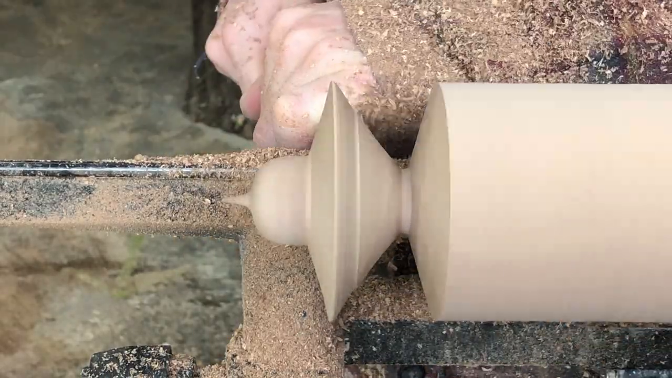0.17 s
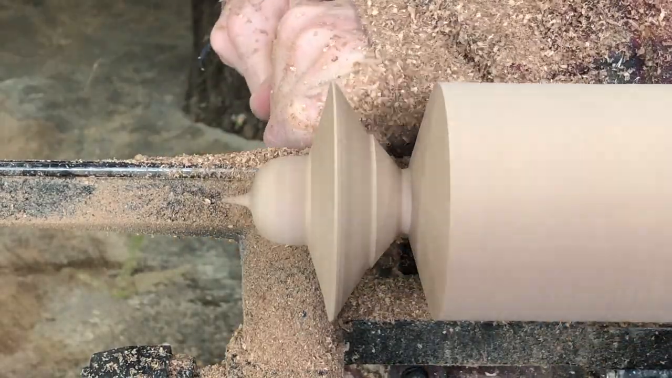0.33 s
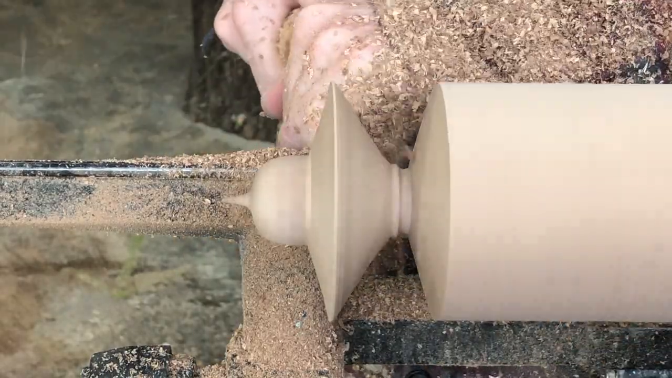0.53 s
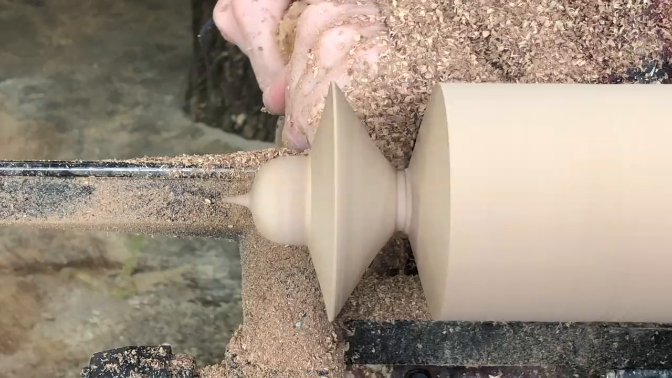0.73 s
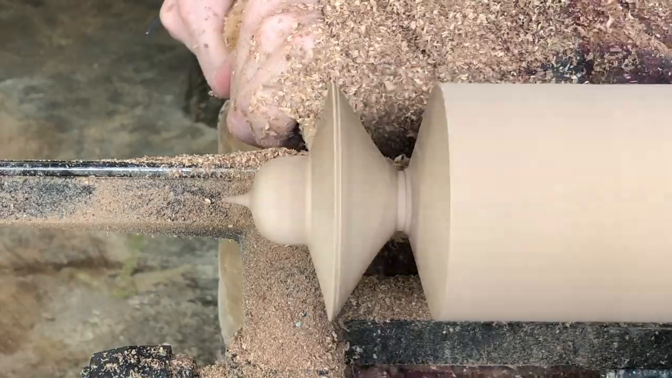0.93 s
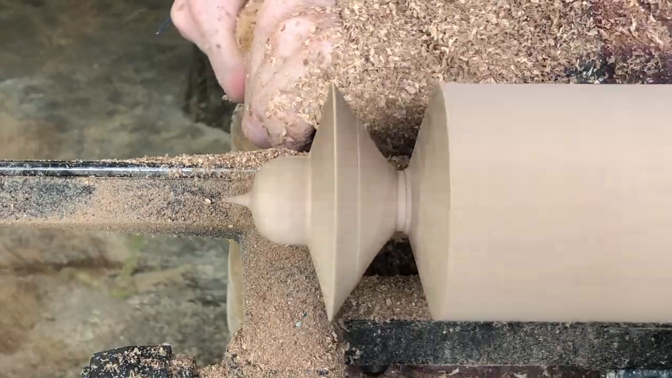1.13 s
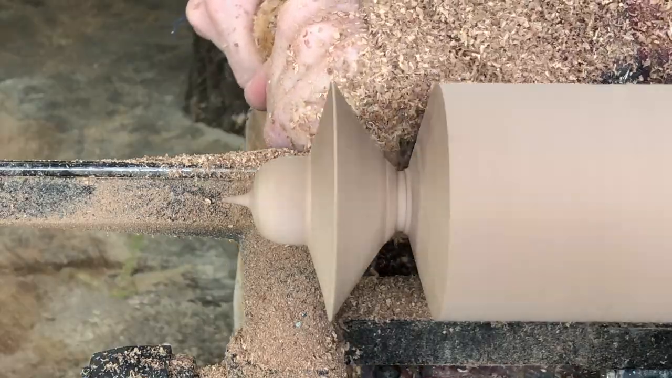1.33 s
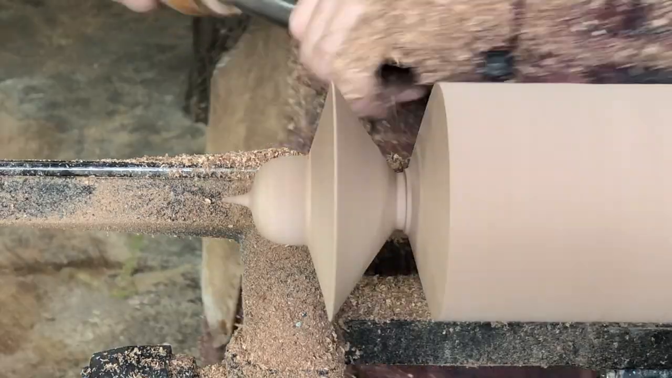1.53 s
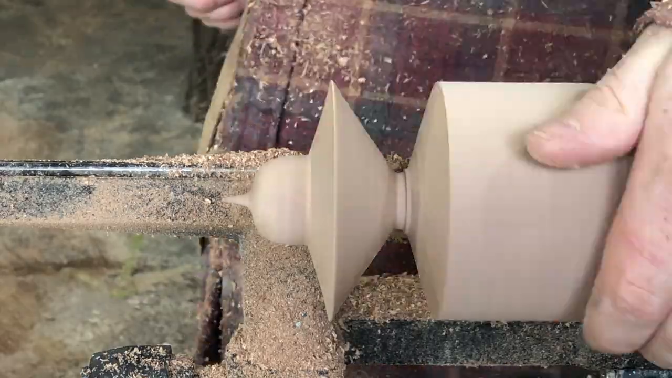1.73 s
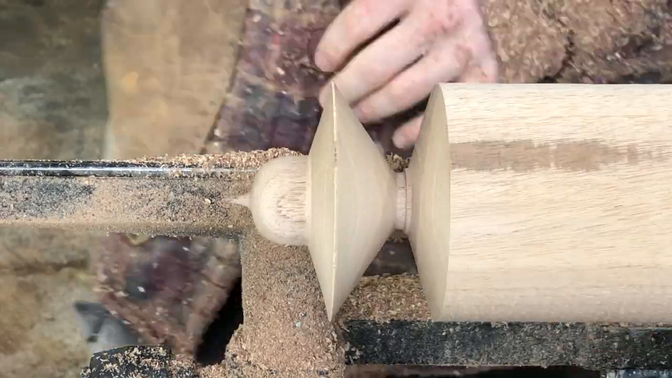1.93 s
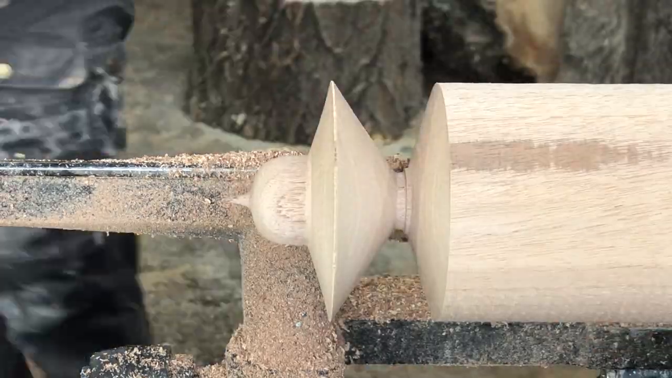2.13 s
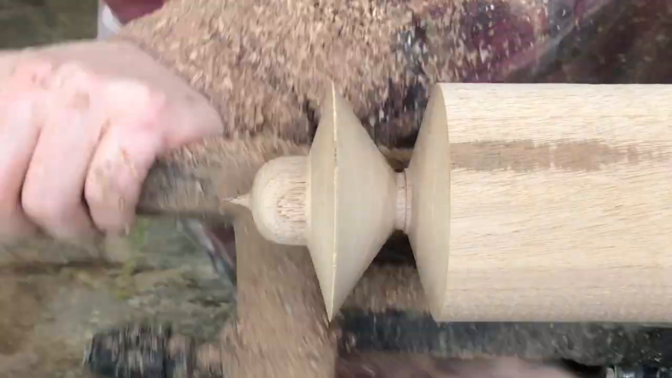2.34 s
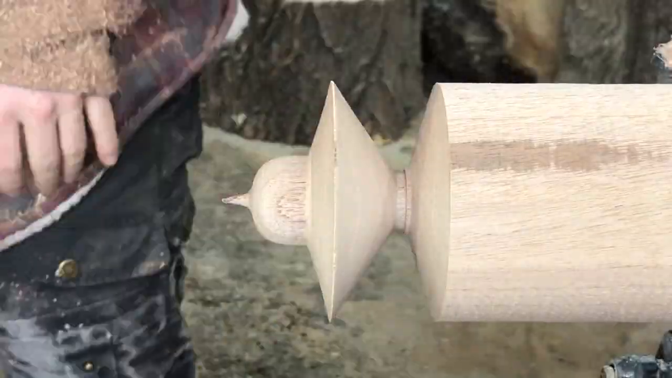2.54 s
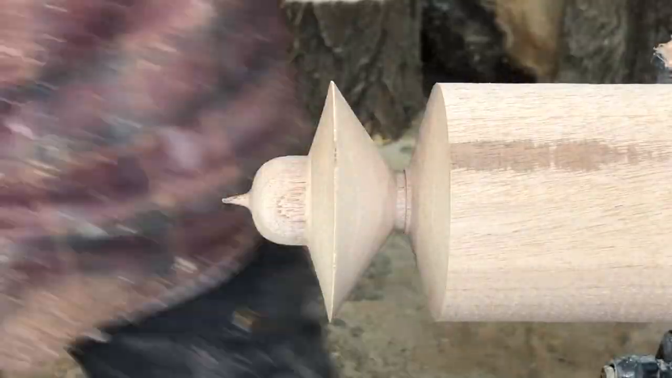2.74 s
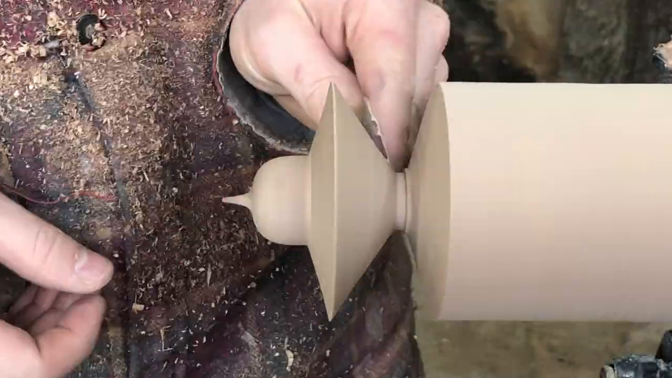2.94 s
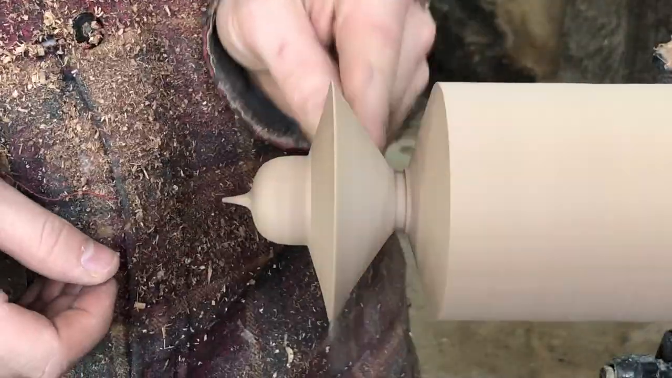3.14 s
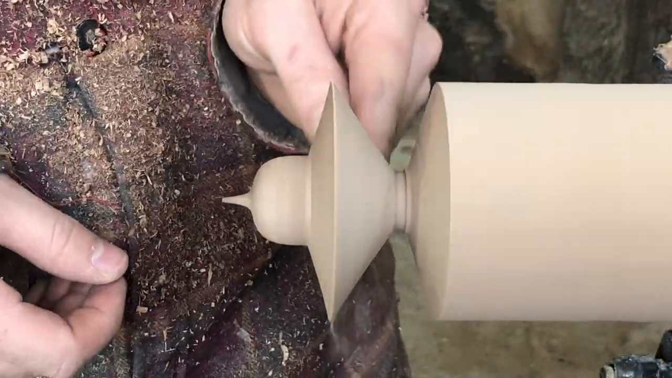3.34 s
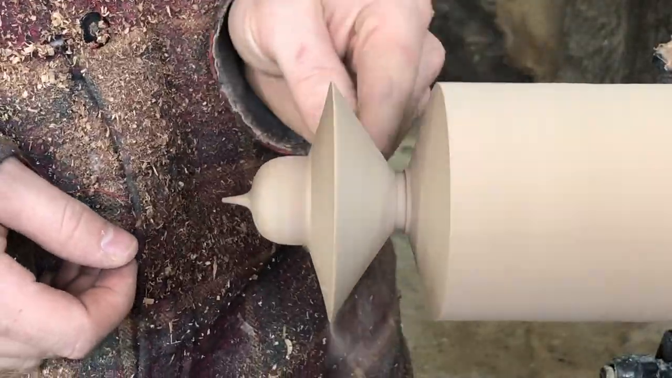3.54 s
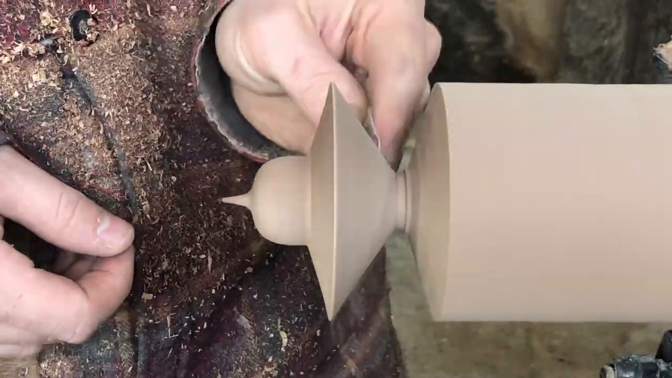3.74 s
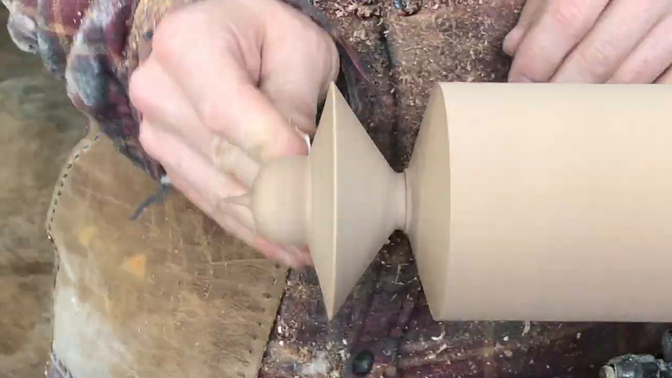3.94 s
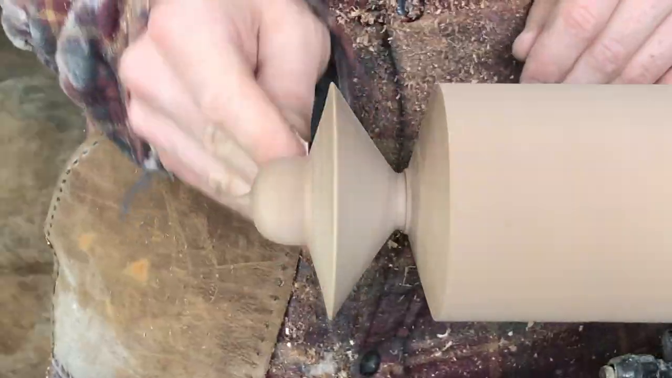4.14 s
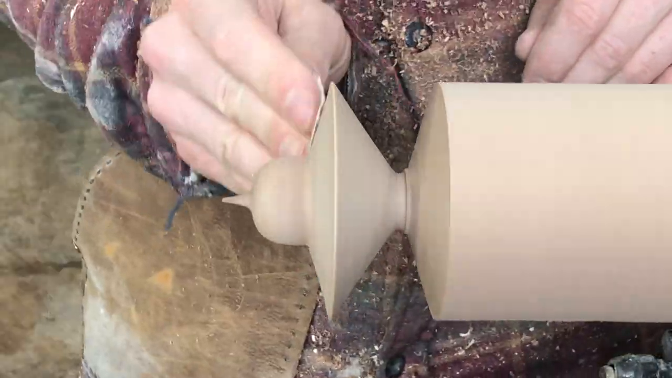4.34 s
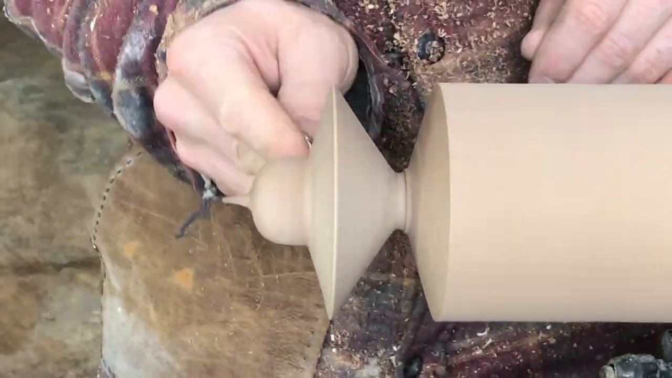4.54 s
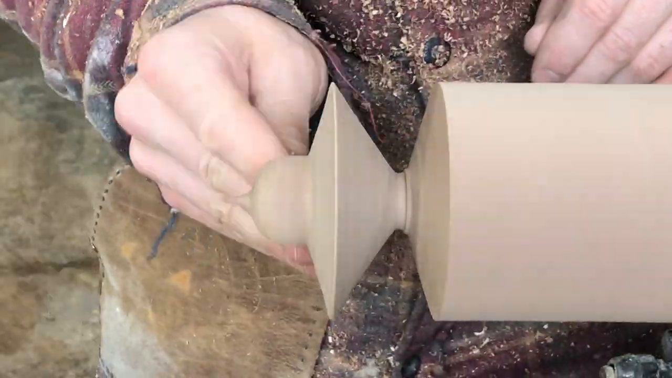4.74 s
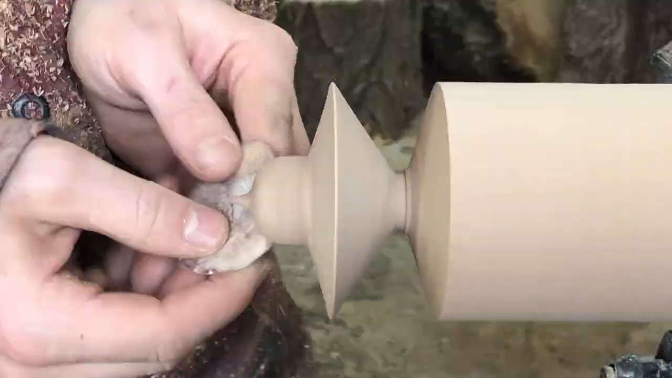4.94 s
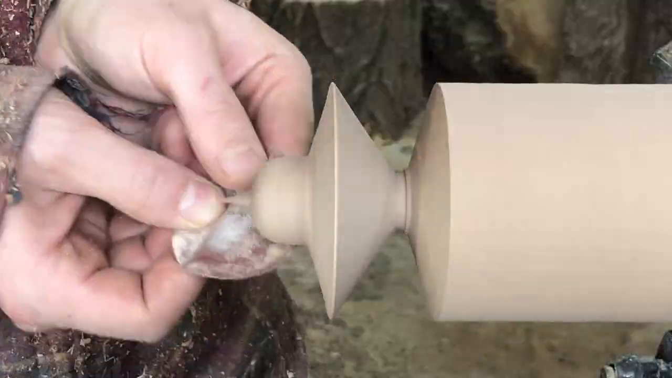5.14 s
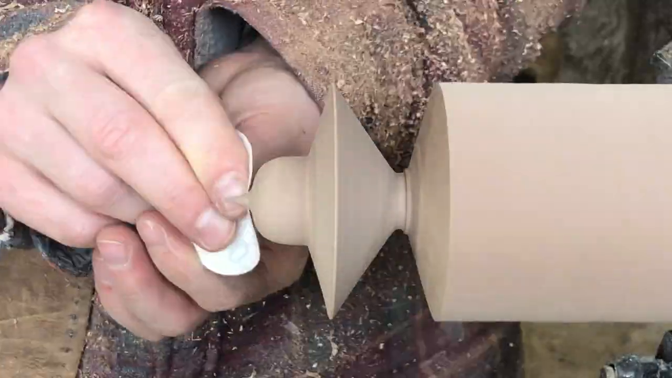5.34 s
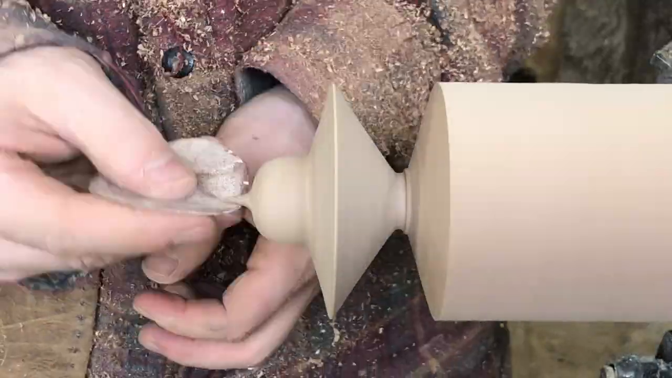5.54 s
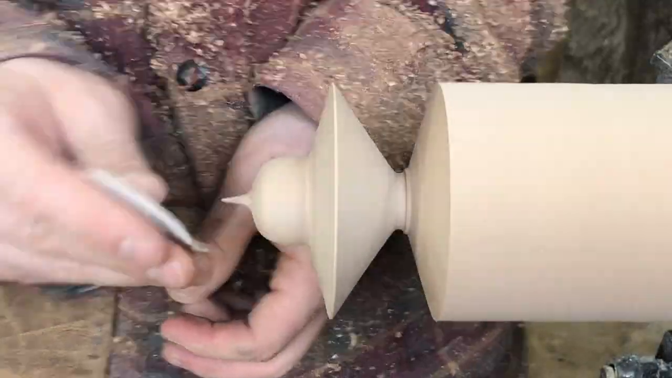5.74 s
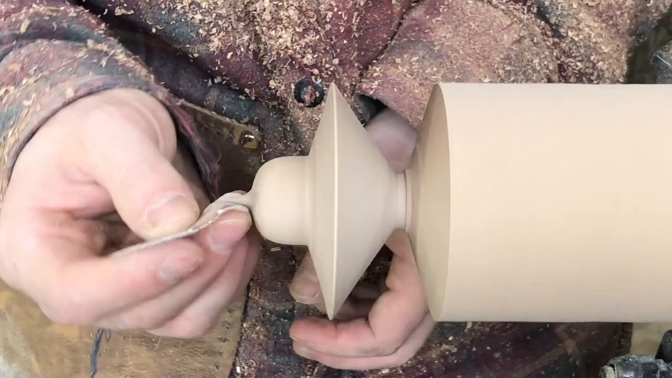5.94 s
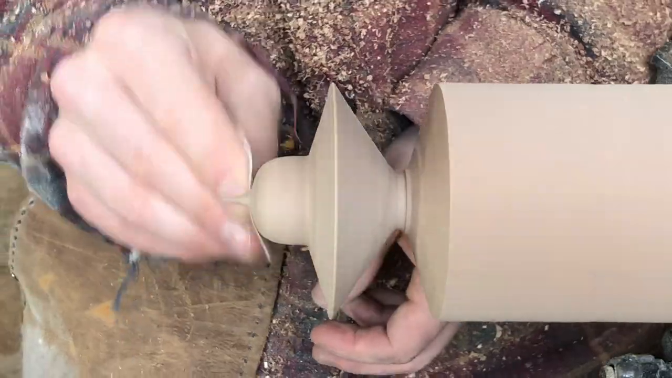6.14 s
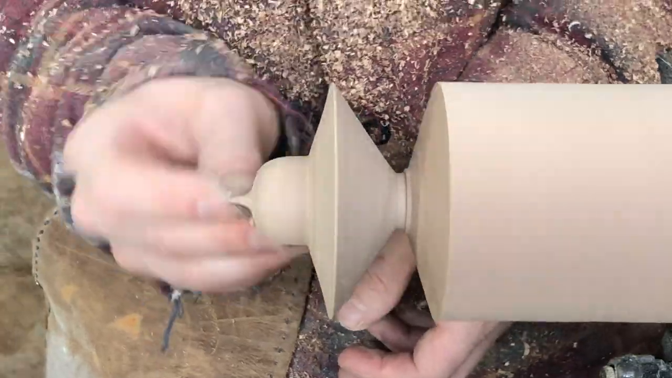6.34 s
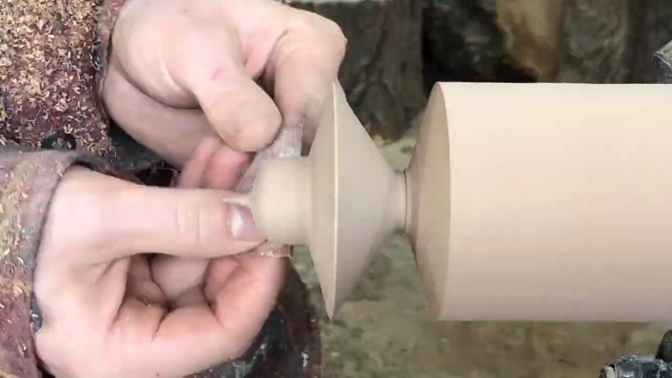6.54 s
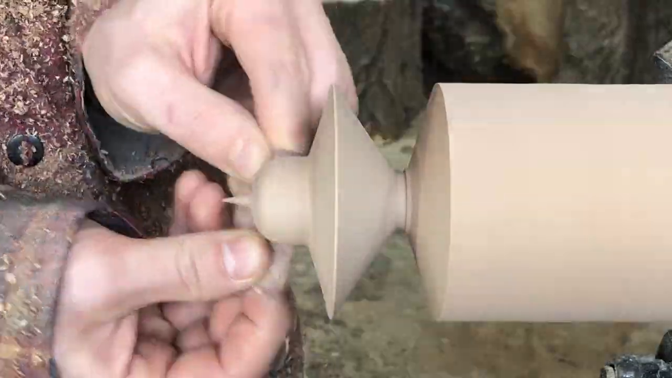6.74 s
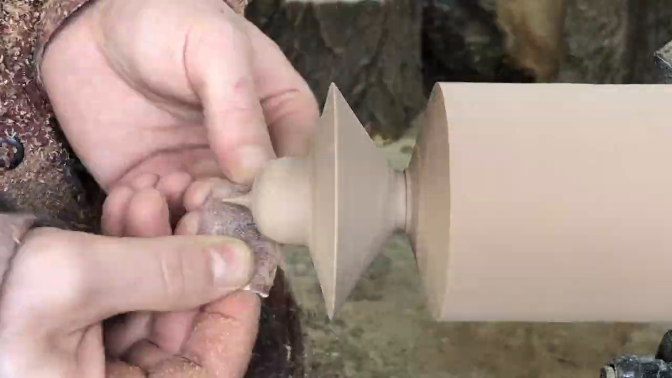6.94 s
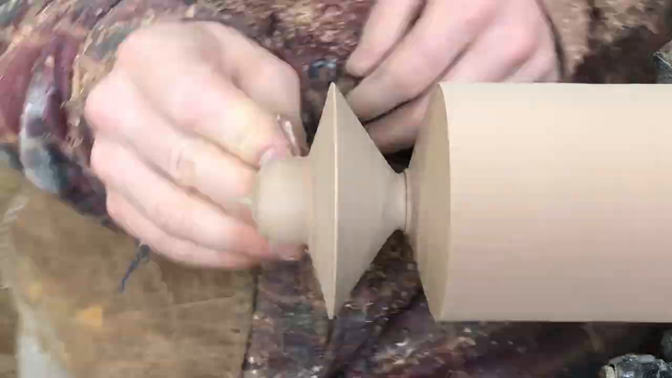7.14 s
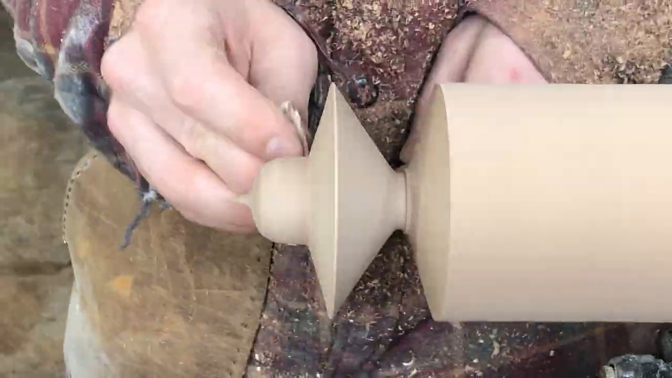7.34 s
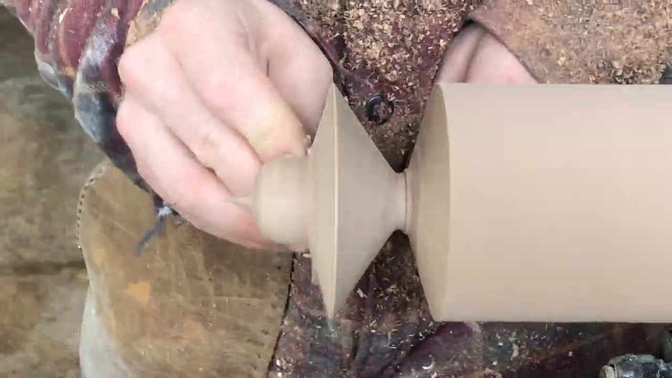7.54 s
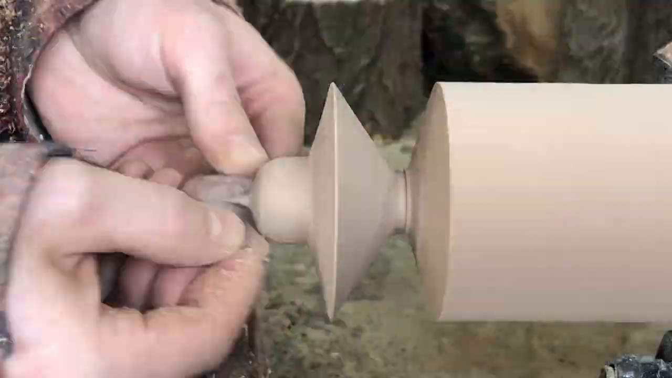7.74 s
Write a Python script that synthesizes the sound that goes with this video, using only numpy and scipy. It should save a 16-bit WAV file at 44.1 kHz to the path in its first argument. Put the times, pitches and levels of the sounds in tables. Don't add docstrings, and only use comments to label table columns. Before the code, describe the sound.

A close, dry workshop sound. From 0 s a lathe motor whirs with a thin, ringing whine and air hiss, while a chisel peels grainy, high hissing shavings from the spinning wood. The cut is strongest around 0.3-0.6 s, with low judder and short squeals near 0.65-0.75 s; a second, lighter cut swells until the chisel lifts with a small squeal and ticks at 1.5 s. At about 1.7 s the motor tones slide down and stop. In the quiet, hands rustle and tick over a faint room murmur and thin fan tone. A sharp metallic knock lands at 2.16 s, a far louder iron clank at 2.64 s. A click and the lathe's abrupt return come at 2.85 s. At 3.44 s everything jumps up in pitch: a brighter, denser whine and hiss holds to about 7.9 s, wavering slightly as sandpaper presses and eases, with a faint low hum.

```python
import sys
import numpy as np
from scipy import signal
from scipy.fft import rfft, irfft
from scipy.io import wavfile
from scipy.ndimage import uniform_filter1d

SR = 44100
rng = np.random.default_rng(int(sys.argv[2]) if len(sys.argv) > 2 else 0)


def convert_level_to_amplitude(level_db):
    exponent = np.asarray(level_db, float) / 20
    return 10 ** exponent


def dump_mix(stems):
    frames = np.atleast_2d(stems).T
    limited = np.clip(frames, -1, 1)
    pcm = np.round(limited * 32767).astype(np.int16)
    wavfile.write(sys.argv[1], SR, pcm)


N = 347508
T = np.arange(N) / SR

OFF_S, ON_S = 1.737, 2.842
LIFT_S = 1.5
LIGHT_DB = -47


def unit(x):
    return x / np.sqrt(np.mean(x ** 2))


def curve(rows, column):
    rows = np.array(rows)
    return np.interp(T, rows[:, 0], rows[:, column])


def fade(rows, column, fade_s=.008):
    edge = np.clip(np.minimum(T - rows[0][0], rows[-1][0] - T) / fade_s + 1, 0, 1)
    on = edge > 0
    edge[on] *= convert_level_to_amplitude(curve(rows, column)[on])
    return edge


def note(s, length, hz, db, attack, release, glide=0., depth_db=22):
    times = s + np.array([-attack, 0, length, length + release])
    levels = db - depth_db * np.array([1, 0, 0, 1])
    return np.transpose([times, hz * np.exp(glide * (times - s)), levels])


def swell(s, length, db, attack, release, depth_db):
    return fade(note(s, length, 1, db, attack, release, depth_db=depth_db), 2)


def coloured(points, size=N):
    hz, db = np.transpose(points)
    f = np.fft.rfftfreq(size, 1 / SR) + 1
    gain = convert_level_to_amplitude(np.interp(np.log(f), np.log(hz), db))
    return unit(irfft(rfft(rng.standard_normal(size)) * gain, size))


def walk(rate):
    k = int(SR / rate / 8)
    steps = np.repeat(rng.standard_normal(N // 8 // k + 2), k)
    slow = uniform_filter1d(uniform_filter1d(steps, k), k)
    return np.repeat(unit(slow), 8)[:N]


def tone(rows, wobble_hz=1.8, overtone_db=-60, rough_db=1.5):
    gain = np.sqrt(2) * fade(rows, 2)
    on = gain > 0
    gain[on] *= convert_level_to_amplitude(rough_db * walk(200)[on])
    phase = 2 * np.pi * np.cumsum((curve(rows, 1) + wobble_hz * walk(150))[on]) / SR
    gain[on] *= np.sin(phase) + convert_level_to_amplitude(overtone_db) * np.sin(2 * phase)
    return gain


def drive(speed, tones_db, low_db, load_db, on, shaft, since_cut=0 * T):
    # (pitch [Hz], level [dB])
    tone_table = [(2401, -60), (2756, -70), (3117, -67), (3569, -66), (4091, -66), (4764, -71), (4990, -72),
                  (5200, -66), (5356, -70), (5394, -70), (5954, -66), (6444, -58), (6541, -62), (6708, -59),
                  (6982, -69), (7144, -54), (7305, -57), (7354, -58), (7574, -61), (7978, -70), (8398, -56),
                  (9125, -67), (9539, -66), (9808, -70), (10406, -64), (10734, -62), (11047, -64),
                  (11310, -65), (12801, -73), (14287, -71), (8333, -59), (7197, -66), (6500, -67),
                  (6728, -64), (6229, -69), (8190, -68)]
    # (pitch [Hz], width [Hz], level [dB])
    housing_table = [(2290, 200, -14), (4110, 220, -11), (5380, 170, -15), (6030, 70, -7), (6270, 90, -8),
                     (6430, 60, -7), (6530, 90, -7), (7210, 50, -8), (7350, 150, -2), (7480, 60, -9),
                     (7565, 80, -4), (8200, 70, -9), (8355, 150, -1), (9220, 260, -12), (9790, 70, -15),
                     (10790, 170, -7), (11030, 60, -11), (11285, 80, -9), (12800, 100, -18),
                     (13400, 140, -17), (14290, 60, -18), (15550, 200, -18)]
    shaft_hz, throb, jitter = 52, 0.15, 0.52
    sink_per_s, die_db_per_s = 3.6, 250
    turning = shaft * np.exp(-sink_per_s * since_cut) + 0.0004 * walk(3)
    clock = (2 * np.pi * speed * np.cumsum(turning) / SR)[on]
    turns = shaft_hz * clock + jitter * walk(10)[on]
    tones = np.zeros(N)
    for k, (hz, db) in enumerate(tone_table):
        turn = 1 + throb * np.sin(turns + 7 * rng.random())
        damped = 7000 < hz < 7200 or 7400 < hz < 8500
        change_db = load_db * (k < 2) - 4 * (T < LIFT_S) * damped + 1.5 * walk(15)
        gain = turn * convert_level_to_amplitude(db + change_db[on])
        tones[on] += gain * np.sin(hz * clock + 7 * rng.random() + jitter * walk(30)[on])
    f = np.fft.rfftfreq(N, 1 / SR) / speed
    power = np.zeros(len(f))
    for hz, width, db in housing_table:
        db = db + low_db * ((hz < 3000) + .17 * (7450 < hz < 8500))
        steepness = np.where(f < hz, 3, 10)
        power += convert_level_to_amplitude(2 * db) / (1 + np.abs(2 * (f - hz) / width) ** steepness)
    housing = irfft(rfft(rng.standard_normal(N)) * np.sqrt(power), N)
    return unit(housing) + convert_level_to_amplitude(tones_db - die_db_per_s * since_cut) * tones / np.std(tones[on])


def running(early):
    coast_db_per_s2 = 5300
    coast = convert_level_to_amplitude(-np.minimum(coast_db_per_s2 * np.maximum(T - OFF_S + early, 0) ** 2, 90))
    return np.maximum(coast, np.clip((T - ON_S) / 0.0043, 0, 1))


def lathe():
    # (frequency [Hz], density [dB per Hz])
    air_slow = [(15, -58), (25, -19), (342, -21.5), (878, -23), (1090, -21.5), (1210, -26.5), (1870, -19),
                (2020, -21.5), (2440, -15), (2720, -17.5), (4420, -14), (6630, -14), (7180, -19.5),
                (15700, -14)]
    # (frequency [Hz], density [dB per Hz])
    air_fast = [(15, -47), (25, -15), (1770, -9), (2320, -8.5), (2720, -10), (4080, -7.5), (4540, -11),
                (6810, -7), (7380, -10), (8910, -6.5), (10200, -8.5), (11100, -5.5), (12000, -9),
                (15700, -12)]
    # (time [s], length [s], level [dB], swell [s], fade [s])
    kick_table = [
        (1.837, 0.038, -59, .003, .025),
        (2.822, 0.0092, -53, 0.032, 0.014),
    ]
    # (time [s], pitch [Hz])
    shaft_table = [
        (3.5, 7138),
        (3.95, 7141),
        (4.4, 7133),
        (4.9, 7144),
        (5.9, 7145),
        (6.4, 7144),
        (6.85, 7136),
        (7.4, 7136),
        (7.85, 7144),
    ]
    faster_s, slow_speed, free_hz = 3.438, .5992, 7144
    cut_s, eased_s = 1.66, 5.03
    loaded_db, eased_db = -9, -2
    chisel_sag, sag_db, air_per_db = .0003, 600, 0.3

    since_cut = np.clip(T - cut_s, 0, .4) * (T < ON_S)
    slow_shaft = 1 - chisel_sag * (T < LIFT_S)
    slow_drive = drive(slow_speed, -1.6, -12.0, loaded_db, T < faster_s + .01, slow_shaft, since_cut)
    kicks = sum(swell(s, length, db, rise, end, 15) for s, length, db, rise, end in kick_table)
    slow = convert_level_to_amplitude(-2.03) * (convert_level_to_amplitude(-41) * running(0) + kicks) * slow_drive
    dust_db = air_per_db * uniform_filter1d(np.maximum(pressure() - LIGHT_DB, 0), size=6000)
    air_gain = convert_level_to_amplitude(-65 + dust_db) * running(0.019) + convert_level_to_amplitude(-24.5) * kicks
    slow = (
        slow + convert_level_to_amplitude(20.0) * air_gain * coloured(air_slow) * convert_level_to_amplitude(0.93 * walk(29.33)))

    shaft = uniform_filter1d(curve(shaft_table, 1), size=4000) / free_hz
    load_db = np.where(T < eased_s, loaded_db, eased_db)
    fast_drive = drive(1, 0.21 + sag_db * (shaft - 1), 0, load_db, T > faster_s - .01, shaft)
    fast = convert_level_to_amplitude(-41.5 + 0.31 * walk(2.45) - 2.1) * fast_drive
    fast = fast + convert_level_to_amplitude(-56.5 + .5 * walk(2.95) + 13.0 + 0.46 * walk(30)) * coloured(air_fast)
    share = np.clip((T - faster_s) / .004 + .5, 0, 1)
    return np.sqrt(1 - share) * slow + np.sqrt(share) * fast


def pressure():
    # (time [s], level [dB])
    cuts = [
        [(0, -54), (.12, -44), (.332, -36.5), (.388, -35.5), (.48, -30.5), (.51, -39), (.59, -32), (.62, -42.5),
         (.79, -49)],
        [(.8, -50), (1.234, -39.5), (1.26, -46), (1.424, -38), (1.48, -43), (1.498, -53), (1.55, -60)],
    ]
    return curve(cuts[0] + cuts[1], 1)


def chisel():
    # (frequency [Hz], density [dB per Hz])
    shaving_points = [(5000, -30), (10500, -11), (11200, 3.5), (12300, 2), (13200, 6), (13800, 4),
                      (14500, 9), (15000, 7), (15700, 0)]
    # (frequency [Hz], density [dB per Hz])
    scrape_points = [(500, -43), (2000, -12), (6000, -5), (10500, -7), (14000, -9)]
    # (frequency [Hz], density [dB per Hz])
    judder_points = [(25, -4), (300, -1), (1000, -1.5), (2000, -2.5), (3500, -11)]
    # (time [s], length [s], pitch [Hz], level [dB], scrape level [dB])
    squeal_table = [
        (0.659, 0.0037, 2945, -34.5, -42),
        (0.711, 0.011, 2940, -37.5, -47),
        (.728, 0.0064, 2950, -33.5, -49),
        (0.744, 0.011, 2960, -39, -52),
        (1.473, 0.0037, 2930, -35.5, -41),
    ]
    # (time [s], length [s], level [dB])
    dig_table = [
        (.345, .02, -58),
        (.38, 0.031, -47),
        (.428, .004, -54),
        (0.448, .006, -53),
        (.478, 0.015, -54),
    ]
    # (time [s], length [s], pitch [Hz], level [dB])
    shank_table = [(0.65, 0.13, 13180, -52), (1.2, .04, 13170, -58), (1.31, 0.11, 13200, -48),
                   (.53, .09, 2842, -51), (1.04, 0.086, 2840, -49), (1.185, .01, 2850, -46.5),
                   (1.04, .2, 2577, -58), (1.28, .1, 2845, -58), (0.25, 1.2, 3110, -57.5),
                   (0.092, 1.55, 3626, -58.5), (.3, 1.15, 5355, -61), (.3, 1.15, 4635, -63),
                   (.3, 1.15, 3370, -65), (.3, 1.15, 3845, -60), (0.055, 0.43, 2880, -58)]
    # (time [s], length [s], pitch [Hz], level [dB])
    rest_table = [
        (1.5, .1, 1185, -65),
        (0.735, 0.06, 1812, -57),
        (1.775, 0.01, 1822, -65.5),
        (.9, 0.67, 1822, -74),
        (3.5, 4.4, 1886, -75),
        (0, .3, 1126, -69.5),
        (.45, 0.4, 1130, -71),
        (1, 0.68, 1140, -68.5),
        (3, 0.39, 1122, -68.5),
    ]
    # (time [s], pitch [Hz], level [dB])
    hum_table = [(3.5, 335, -72), (3.9, 310, -72), (4.3, 350, -69), (4.6, 300, -72), (5.15, 300, -69.5),
                 (5.5, 280, -70.5), (6.0, 280, -77), (6.8, 320, -72), (7.2, 295, -73), (7.6, 348, -70),
                 (7.88, 320, -75)]
    scrape_db, judder_db, judder_per_db = -55, -66, 0.77

    push = pressure()
    touch = np.clip((LIFT_S - T) / .05 + 1, 0, 1)
    shavings = convert_level_to_amplitude(1.7 * walk(150) - 4.0 + push) * touch * coloured(shaving_points)
    grab = sum(swell(s, length, db, 0.035, 0.024, 15) for s, length, _, _, db in squeal_table)
    scrape_gain = convert_level_to_amplitude(scrape_db + 1.3 * walk(11.4)) * touch + grab
    scrape = convert_level_to_amplitude(2.0 * walk(100) - 1.0) * scrape_gain * coloured(scrape_points)
    dig = sum(swell(s, length, db, .015, .008, 10) for s, length, db in dig_table)
    shake = convert_level_to_amplitude(judder_db + judder_per_db * np.maximum(push - LIGHT_DB, 0)) * touch + dig + convert_level_to_amplitude(-24) * grab
    judder = convert_level_to_amplitude(1.9 * walk(400) - .8) * shake * coloured(judder_points)
    chatter = sum(tone(note(s, length, hz, db, .009, 0.027, glide=0.12),
                       wobble_hz=18.0, overtone_db=-8.5, rough_db=2.5) for s, length, hz, db, _ in squeal_table)
    shank = sum(tone(note(*row, .08, 0.067, depth_db=17), wobble_hz=(row[2] / 1700) ** 2, rough_db=2.5)
                for row in shank_table)
    rest = sum(tone(note(*row, 0.1, 0.1, depth_db=17), wobble_hz=3.9) for row in rest_table)
    hum = convert_level_to_amplitude(2.4 * walk(8)) * tone(hum_table, wobble_hz=12.0)
    return shavings + scrape + judder + chatter + shank + rest + hum


def burst(treble_db, bass_db, t60, rise, crackle_db=2.7):
    t = T[:8192]
    noise = coloured([(30, bass_db - 9.0), (400, bass_db - 8.0), (1000, bass_db + 3.0), (2500, 0.87), (6000, -3.5),
                      (11000, treble_db + 0.5), (16000, treble_db - 2.0)], size=8192)
    crackle = convert_level_to_amplitude(crackle_db * uniform_filter1d(np.repeat(rng.standard_normal(128), 64), size=48))
    onset = np.minimum(t / max(rise, 1e-4), 1) ** .5
    return noise * crackle * onset * convert_level_to_amplitude(-60 * np.maximum(t - rise, 0) / max(t60, .003))


def add(out, s, x):
    i = int(s * SR)
    out[i:i + len(x)] += x


def rustles():
    # (time [s], peak [dB], treble [dB], t60 [s])
    tick_table = [(1.729, -35, -6, .02), (.718, -27, -5, .01), (.658, -39, -4, .01), (1.8345, -47, -1, .02),
                  (1.843, -52, 2, .012), (1.853, -54, 4, .015), (1.859, -55, 3, .012),
                  (1.8705, -44, 5, .018), (1.882, -54, 4, .012), (1.901, -55, 3, .015),
                  (1.9345, -52, -2, .03), (2.017, -52, -10, .03), (2.033, -42, -8, .03),
                  (2.051, -58, -8, .015), (2.0857, -57, -6, .05), (2.109, -57, -3, .02),
                  (2.142, -35, -1.5, 0.032), (2.335, -41, 4, .006), (2.336, -51, -3, .05),
                  (2.4504, -47, -2, .04), (2.506, -41, -3, 0.042), (2.5445, -53, -14, .012),
                  (2.550, -54, -3, .012), (2.714, -58, 6, .02), (2.720, -60, 4, .015),
                  (2.765, -63, -22, .015), (2.852, -26, -1, .012), (2.603, -43, -17, .03),
                  (2.793, -52, -6, .03), (2.572, -60, -18, .012), (2.206, -62, 0, .015),
                  (2.217, -62, 0, .012)]
    # (time [s], peak [dB], treble [dB], rise [s])
    brush_table = [(1.839, -58, -7, 0.026), (1.955, -62, -4, .02), (1.974, -50, -7, .005),
                   (1.983, -52, -7, .006), (2.011, -55, -6, 0.006), (2.095, -63, -8, .012),
                   (2.114, -55, 0, 0.01), (2.150, -48, -4, 0.0067), (2.245, -53, -6, .004),
                   (2.253, -46, -7, 0.0086), (2.28, -64, -3, .01), (2.296, -46.5, -8, 0.009),
                   (2.35, -63, -9, .04), (2.39, -63, -9, .03), (2.458, -60, -2, .025),
                   (2.565, -65, -10, .01), (2.582, -56, -8, .003), (2.598, -50, -17, .004),
                   (2.61, -51.5, -4, 0.023), (2.792, -46, -4.5, 0.022)]
    dull_bass = 0.93
    out = np.zeros(N)
    for s, db, treble_db, t60 in tick_table:
        bass_db = -20.5 - dull_bass * treble_db
        add(out, s, convert_level_to_amplitude(db - 6.5) * burst(treble_db, bass_db, t60, .0006, crackle_db=1.0))
    for s, db, treble_db, rise in brush_table:
        t60 = 0.02 + 1.8 * rise
        add(out, s, convert_level_to_amplitude(db - 7.0) * burst(treble_db, -18 - dull_bass * treble_db, t60, rise))
    return out


def knocks():
    # (time [s], peak [dB], treble [dB], crack t60 [s], bass edge [Hz])
    knock_table = [
        (2.1593, -15, -12, 0.033, 1900),
        (2.643, -4, -18, 0.024, 650),
    ]
    # (pitch [Hz], level [dB], t60 [s])
    latch_modes = [(2590, -14, .035), (3140, -1, .034), (3397, -15, 0.043), (4581, -3, .016),
                   (5792, -6, .024), (6164, 0.5, 0.027), (7200, -14, .03), (8280, -8, .016),
                   (8834, -14, .026), (9921, -16, .028), (12210, -17, .024)]
    # (pitch [Hz], level [dB], t60 [s])
    bed_modes = [(1150, -5.5, .016), (1400, 0.5, 0.03), (1715, -0.5, 0.022), (2245, -7, 0.025),
                 (2566, 2, 0.029), (3040, 2.5, 0.021), (3373, -6, 0.04), (3680, -6, .022),
                 (4110, -16, 0.024), (5260, -11, 0.028), (5916, -14, .021), (7354, -18, 0.025),
                 (9028, -18, .022), (10540, -11, 0.02)]
    out, t = np.zeros(N), T[:8192]
    for blow, modes, ring_db in zip(knock_table, (latch_modes, bed_modes), (-4.0, -3.0)):
        s, db, treble_db, t60, edge_hz = blow
        bass_db = -19.0
        ring = sum(convert_level_to_amplitude(g - 60 * t / d) * np.sin(2 * np.pi * hz * t + 7 * rng.random()) for hz, g, d in modes)
        ring = ring / np.abs(ring).max() * np.minimum(t / 0.0018, 1)
        crack = convert_level_to_amplitude(-13.0) * burst(treble_db, bass_db, t60, 0.0012, crackle_db=1.5)
        tail = convert_level_to_amplitude(-39.0) * burst(treble_db - 9.0, bass_db + 8.0, 0.054, 0.003, crackle_db=1.2)
        far = convert_level_to_amplitude(-60.0) * burst(treble_db - 17.5, bass_db + 22.0, 0.2, 0.01, crackle_db=1.2)
        knock = convert_level_to_amplitude(ring_db) * ring + crack + tail + far
        thin = signal.butter(3, edge_hz, "high", fs=SR, output="sos")
        add(out, s, convert_level_to_amplitude(db) * (signal.sosfilt(thin, knock) + convert_level_to_amplitude(-14.5) * knock))
    return out


def small_rings():
    # (time [s], pitch [Hz], level [dB], length [s])
    ring_table = [(2.335, 2460, -60, .016), (2.462, 3760, -58, 0.013), (2.478, 3770, -57, .016),
                  (2.601, 1330, -54, .009), (2.9, 1400, -50, .01), (2.603, 2050, -48, .005),
                  (2.852, 2450, -40.5, .01), (2.85, 1900, -48, .016), (2.665, 1350, -37, .0035),
                  (2.655, 1350, -46, .01), (2.675, 1450, -45, .004), (2.682, 1400, -53, .012),
                  (2.697, 1300, -53, .005), (2.688, 1600, -61, .01), (2.708, 1450, -63, .008),
                  (1.733, 2460, -44, .01), (1.866, 3600, -62, .035), (1.8, 3600, -66, .02),
                  (1.934, 3950, -62, .008), (3.4, 1400, -56, .017), (2.79, 2160, -58, 0.045),
                  (1.848, 2450, -58, .014), (1.835, 4450, -56, .012), (1.977, 3100, -60, .014),
                  (1.98, 6200, -61, .01), (2.016, 4550, -57, .005), (2.034, 4500, -51, 0.0044),
                  (2.034, 2600, -56, .005), (2.087, 2200, -68, .012), (2.255, 4600, -59, .008),
                  (2.6, 2200, -57, .007), (2.508, 5400, -60, .01), (2.582, 4900, -64, .005),
                  (2.815, 4400, -57, .012), (1.461, 5850, -41, .02), (1.465, 2450, -48, .016),
                  (1.468, 3850, -45, .022), (.51, 3860, -39.5, .025), (.445, 4400, -42, .025),
                  (.738, 2450, -44, .018), (1.885, 4400, -62, .02), (2.3, 2150, -58, .007),
                  (2.301, 3400, -60, .008), (2.26, 2300, -61, .006), (2.355, 2460, -72, .025),
                  (2.12, 2250, -68, .01), (2.117, 3300, -65, .01), (2.115, 4700, -69, .01),
                  (2.602, 3700, -58, .008), (.652, 3200, -47, .02), (.712, 3200, -46, .02),
                  (1.465, 3200, -48, .02), (2.82, 2300, -56, .012), (2.144, 3700, -58, .008),
                  (2.142, 5200, -54, .008)]
    out, t = np.zeros(N), T[:8192]
    for s, hz, db, length in ring_table:
        rough = uniform_filter1d(np.repeat(rng.standard_normal((2, 64)), 128, axis=1), size=128)
        envelope = convert_level_to_amplitude(db + 2.4 * rough[0]) * np.minimum(t / 0.0016, 1) * np.exp(-(t / length) ** 2)
        add(out, s, envelope * np.sin(2 * np.pi * hz * t + 0.52 * rough[1]))
    return out


def run_down():
    # (time [s], length [s], start pitch [Hz], level [dB])
    pass_table = [
        (1.702, 0.01, 5070, -44),
        (1.718, .008, 4430, -41),
        (1.665, 0.022, 3870, -47),
        (1.704, .006, 2480, -45),
        (1.736, 0.004, 2020, -51),
        (1.753, .002, 1920, -58),
        (1.74, 0.004, 3630, -47.5),
        (1.692, .006, 5300, -50),
    ]
    return sum(tone(note(*row, .012, .014, glide=-2.3, depth_db=16), wobble_hz=35.0, rough_db=2.5)
               for row in pass_table)


def fan():
    start_s, end_s, start_hz, drag_per_s, level_db = .5, 3.42, 1307, .082, -73.5
    times = np.linspace(start_s, end_s, num=40)
    pitch = start_hz / (1 + drag_per_s * (times - start_s))
    return convert_level_to_amplitude(1.8 * walk(24.9)) * tone(np.transpose([times, pitch, level_db + 0 * times]), wobble_hz=3.0)


def guard():
    # (time [s], length [s], pitch [Hz], level [dB])
    guard_table = [
        (1.74, .06, 10550, -64),
        (1.84, .06, 10550, -70),
        (1.76, .05, 10050, -68),
        (1.85, .04, 10250, -70),
        (2.86, .03, 10550, -58),
    ]
    return sum(tone(note(*row, .01, .05, depth_db=12), wobble_hz=30.0, rough_db=2.0) for row in guard_table)


def shop():
    # (frequency [Hz], density [dB per Hz])
    shop_points = [(25, -9), (220, -20), (420, -13.5), (600, 0.5), (1500, -2.5), (4000, -8.5),
                   (6000, -14.5), (9000, -12), (15700, -25)]
    return convert_level_to_amplitude(-72.5 + 1.8 * walk(40)) * coloured(shop_points)


def split(mid):
    # (time [s], low edge [Hz], high edge [Hz])
    split_table = [(3.655, 4100, 5300), (3.725, 5600, 7700), (3.725, 12300, 15300), (3.865, 8900, 11200),
                   (4.45, 4100, 5300), (5.1, 9500, 11200), (5.1, 13000, 14600), (5.17, 14400, 16000),
                   (5.47, 4100, 5300), (6.095, 11600, 13300), (6.305, 4100, 5300), (6.305, 10900, 13900),
                   (7.35, 10900, 12500)]
    length_s, level_db = .046, -2.5
    side, size = np.zeros(N), int(length_s * SR)
    f = np.fft.rfftfreq(size, 1 / SR)
    for s, low_hz, high_hz in split_table:
        i = int((s + .2) * SR)
        patch = irfft(rfft(mid[i:i + size]) * (f > low_hz) * (f < high_hz), size)
        add(side, s - length_s / 2, convert_level_to_amplitude(level_db) * np.hanning(size) * patch)
    return mid + side * np.array([[1], [-1]])


def scene():
    hands = rustles() + knocks() + small_rings()
    return split(lathe() + chisel() + hands + run_down() + fan() + guard() + shop())


def band_limit(x):
    return signal.sosfilt(signal.butter(12, 16690, fs=SR, output="sos"), x)


def record(dry):
    limit, top_hz = .42, 15740
    rounded = limit * np.tanh(dry / limit)
    above = np.clip((np.fft.rfftfreq(N, 1 / SR) - top_hz) / 120, 0, 1)
    mix = irfft(rfft(rounded) * convert_level_to_amplitude(-80 * above), N)
    return band_limit(mix)


dry = scene()
out = record(dry)
dump_mix(out)
```